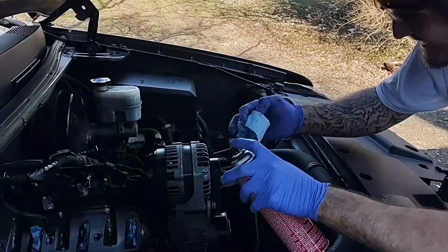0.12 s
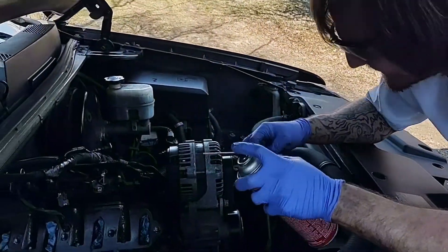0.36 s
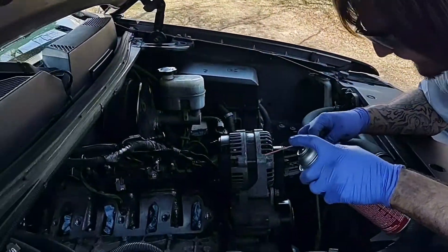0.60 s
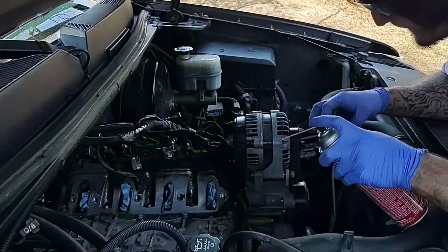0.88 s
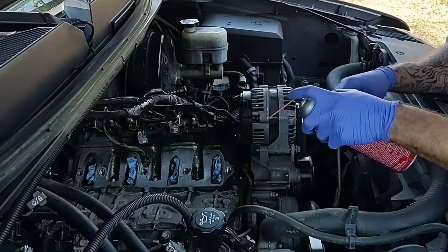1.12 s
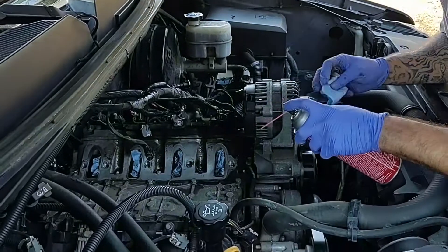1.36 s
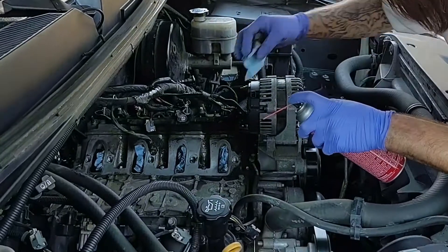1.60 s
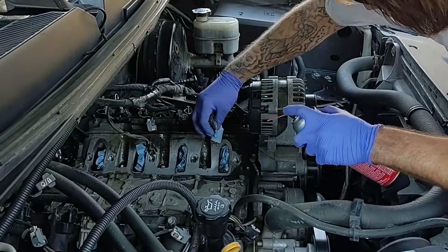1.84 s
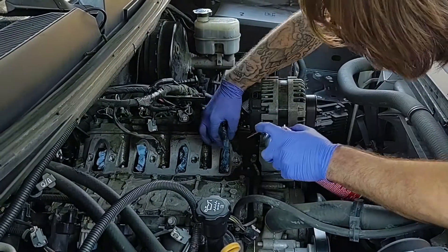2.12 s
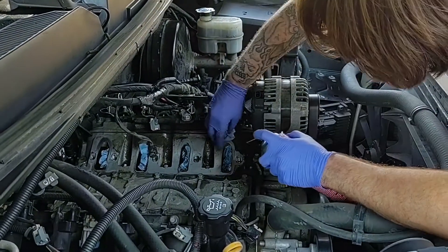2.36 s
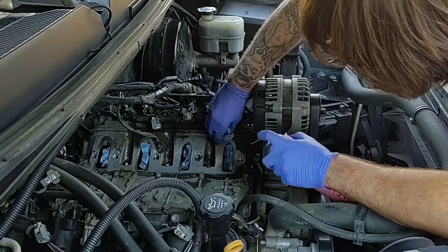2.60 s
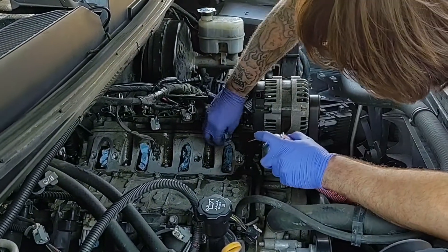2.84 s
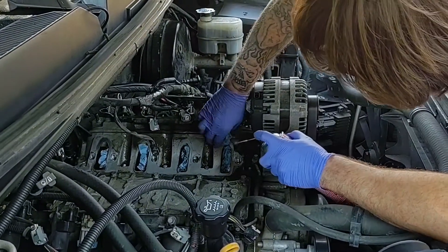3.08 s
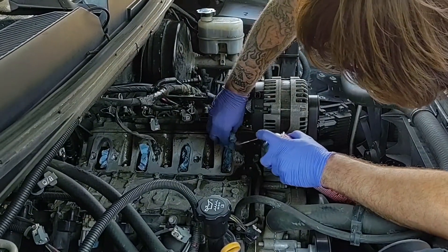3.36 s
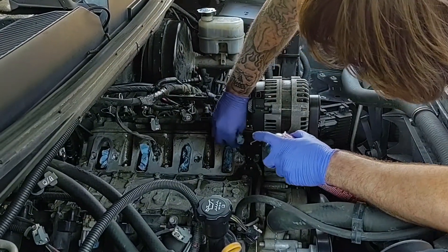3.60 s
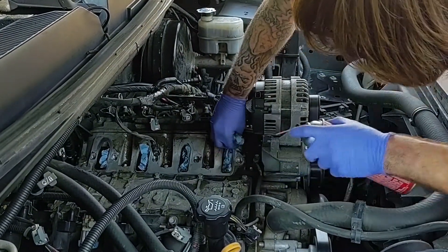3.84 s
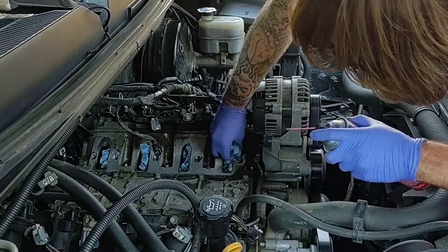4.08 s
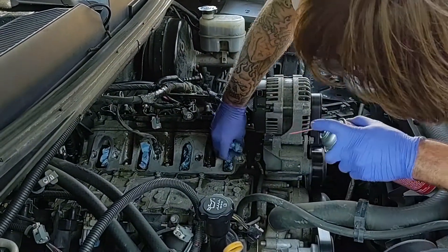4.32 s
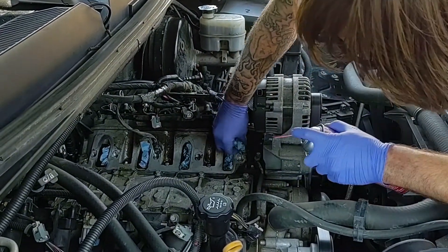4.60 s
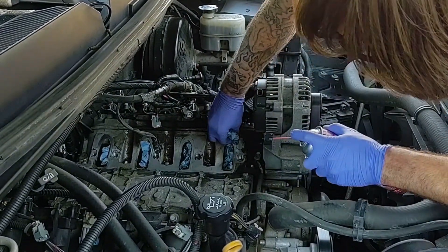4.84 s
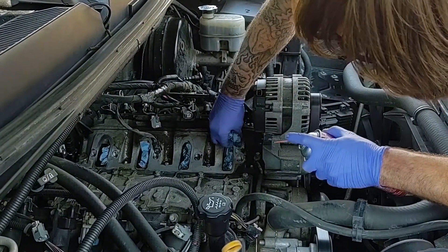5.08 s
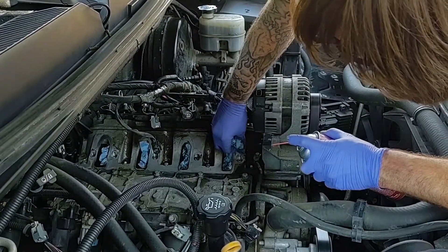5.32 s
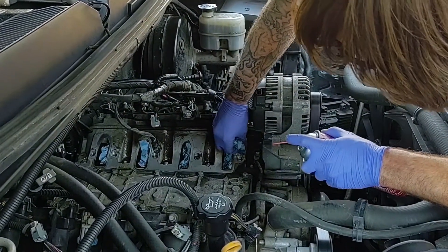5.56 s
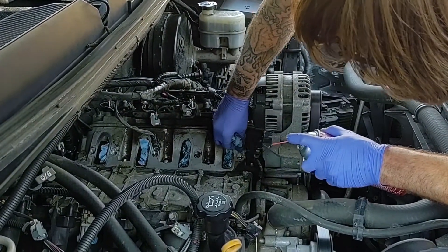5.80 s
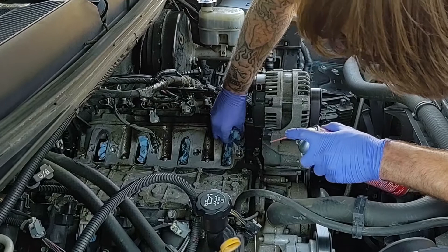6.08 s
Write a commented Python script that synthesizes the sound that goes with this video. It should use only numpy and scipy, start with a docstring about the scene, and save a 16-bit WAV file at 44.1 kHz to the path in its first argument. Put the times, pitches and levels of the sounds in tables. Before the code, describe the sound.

Close stereo sound in an open engine bay outdoors, with very quiet air, softly swelling distant traffic and a faint low drone that slowly grows. From 0 s a gloved hand crumples a rag: fine rustle, crisp bright snaps and light bumps. At about 0.65 s a tight cluster of hollow metallic knocks is the loudest contact, with a thin high squeak just after and a faint wavering whistle near 0.9 to 1.05 s. Smaller knocks and snaps continue to 1.95 s, then it calms to slight rustling. A short rub at 2.8 s leads to two strong, dry, hissy strokes near 3.1 and 3.5 s. Small bumps fall around 3.8 s, then soft even scrubbing strokes come roughly every 0.15 s until 4.85 s. From 4.95 s rougher rubs and sharp snaps mix with low wind popping on the left, a strong stroke at 5.8 s, then lighter rubbing to about 6.2 s.

```python
"""Rag scrubbing in an engine bay

A gloved hand crumples a rag, bumps around an open engine bay, then scrubs the metal ports back and forth.
Dense fibre ticks follow the hand's speed; noise ticks make the snaps, ringing modes the knocks, and the bay
scatters rag, snaps and cracks. Thin sine tones, filtered-noise traffic, a drone and a faint hiss surround
them; wind is lumpy low noise, with late gusts popping on the left microphone port."""
import sys
import numpy as np
from scipy import signal
from scipy.fft import rfft, irfft
from scipy.io import wavfile
from scipy.ndimage import uniform_filter1d

SR = 44100
rng = np.random.default_rng(int(sys.argv[2]) if len(sys.argv) > 2 else 0)


def volts(x):
    """Linear amplitude factor 10**(x/20) for a level x in dB, scalar or array-like."""
    e = np.asarray(x, float) / 20
    return 10 ** e


def generate_wav(sig):
    """Save sig (samples, or channels by samples) to the path in sys.argv[1] as 16-bit PCM at SR."""
    pcm = np.round(np.clip(np.atleast_2d(sig).T, -1, 1) * 32767).astype(np.int16)
    wavfile.write(sys.argv[1], SR, pcm)


N = 272979

# Tone of light fibres on metal. Each row: frequency in Hz, relative level in dB.
FIBRE_TONE = [(1500, -65), (2500, -32.5), (4500, -19), (7000, -8.5), (9000, -5), (12400, 3), (14000, -6.5),
              (15000, -2), (16000, -10)]
# Tone of a hard contact. Each row: frequency in Hz, relative level in dB.
CONTACT_TONE = [(500, -28), (900, -11), (1300, -3), (1800, -4.5), (2600, -3), (3500, -7), (5300, -14.5),
                (14000, -19)]


def read(points, hz):
    """Reads a spectrum at hz, interpolating along log frequency."""
    f, value = np.transpose(points)
    return np.interp(np.log(hz + 1), np.log(f + 1), value)


def evened(x):
    """Scales to rms 1."""
    return x / np.sqrt(np.mean(x ** 2) + 1e-20)


def colour(x, points):
    """Shapes the spectrum of x by a curve in dB."""
    gain = volts(read(points, np.fft.rfftfreq(x.shape[-1], 1 / SR)))
    return irfft(rfft(x) * gain, x.shape[-1])


def curve(rows):
    """Draws the columns of a timed table sample by sample."""
    s, *columns = np.transpose(rows)
    return [np.interp(np.arange(N) / SR, s, c) for c in columns]


def add(mix, s, sound):
    """Mixes a sound in at time s, in seconds."""
    part = mix[round(s * SR):][:len(sound)]
    part += sound[:len(part)]


def resonate(x, hz, width_hz):
    """Shifts hz down to zero, smooths, shifts back: a resonance of gain 1."""
    turn = np.exp(2j * np.pi * np.cumsum(hz * np.ones(len(x))) / SR)
    r = np.exp(-np.pi * width_hz / SR)
    smooth = signal.lfilter([1 - r], [1, -r], x / turn)
    return 2 * (turn * smooth).real


def wobble(seconds):
    """Slow random drift of rms 1: noise averaged twice over a short window."""
    size = round(seconds * SR)
    once = uniform_filter1d(rng.standard_normal(N), size=size)
    return evened(uniform_filter1d(once, size=size))


def burst(t60, rise_s):
    """Envelope of a short event: a quick rise times an exponential fall."""
    t = np.arange(round(.3 * SR)) / SR
    rise = 1 - np.exp(-t / max(rise_s, 1e-4))
    return rise * volts(-60 * t / max(t60, .004))


def fibres(per_s, spread_db, clump_db):
    """Dense ticks of uneven size that come in clumps of a few milliseconds."""
    ticks = rng.choice([-1., 1.], N) * (rng.random(N) < per_s / SR)
    size_db = spread_db * np.minimum(rng.exponential(1, N), 4)
    return ticks * volts(size_db + clump_db * wobble(0.0025))


def swells(rows):
    """Summed gain of sources that near and recede: power falls as 1 / distance squared."""
    t = np.arange(N) / SR
    power = sum(volts(2 * db) / (1 + ((t - s) / width_s) ** 2) for s, db, width_s in rows)
    return np.sqrt(power)


def yard():
    """Outdoor hush, traffic that swells as it passes, and a drone; hush and traffic are most alike in the bass."""
    # Each row: frequency in Hz, relative level in dB.
    hush_tone = [(18, -49), (30, 1.5), (114, -4), (231, -9), (434, -14.5), (660, -19), (904, -24),
                 (1090, -21.5), (1530, -14.5), (2580, -27), (3620, -23.5), (5960, -31), (7160, -36),
                 (12400, -24), (15700, -67)]
    # Each row: frequency in Hz, likeness of left and right from 0 to 1.
    likeness = [(60, 0.9), (300, 1), (700, 0.632), (1400, 0.709), (2500, 0.45), (16000, 0.21)]
    # Far vehicles. Each row: nearest moment in seconds, tyre roar in dB, tyre hiss in dB,
    # time to fall 3 dB in seconds.
    passes = [(0, -90, -57, 0.13), (.93, -64.5, -58, 0.2942), (2.8, -60.5, -62, 0.52),
              (4.3, -67, -64.5, 0.25), (5.25, -60.5, -53.5, 0.2811), (6.05, -60, -54.5, 0.12)]
    # Centre of the tyre roar; it rises and falls once, around 2.2 to 3.4 s.
    # Each row: time in seconds, frequency in Hz.
    roar_pitch = [(0, 870), (2.2, 878), (2.65, 940), (3.05, 950), (3.4, 864.3), (6.19, 895)]
    roar_width_hz, hush_db = 280, -57
    # a distant machine drone, slowly growing
    drone_hz, drone_width_hz, drone_start_db, drone_db_per_s = 123.3, 16.6, -65.5, 1.8

    a, b = rfft(rng.standard_normal((2, 3, N)))
    same = np.clip(read(likeness, np.fft.rfftfreq(N, 1 / SR)), 0, 1)
    right = same * a + np.sqrt(1 - same ** 2) * b
    hush, roar, hiss = np.moveaxis(irfft([a, right], N), 1, 0)

    hush_gain = volts(hush_db + 1.5 * wobble(0.063))
    hush = hush_gain * evened(colour(hush, hush_tone))

    roar_hz = curve(roar_pitch)[0]
    roar = [resonate(resonate(port, roar_hz, roar_width_hz), roar_hz, roar_width_hz) for port in roar]
    roar = swells([(s, roar_db, fall_s) for s, roar_db, _, fall_s in passes]) * evened(np.array(roar))

    hiss = colour(hiss, [(1200, 4), (2000, 10.0), (2700, 10), (3300, 9.5), (4200, -71)])
    hiss = swells([(s, hiss_db, fall_s) for s, _, hiss_db, fall_s in passes]) * evened(hiss)

    drone = resonate(rng.standard_normal(N), drone_hz, drone_width_hz)
    drone = evened(resonate(drone, drone_hz, drone_width_hz))
    drone_gain = volts(drone_start_db + drone_db_per_s * np.arange(N) / SR)
    return hush + roar + hiss + drone_gain * drone


def narrow_hiss():
    """A faint thin band of smooth noise comes and goes, unrelated in the two ports."""
    # Each row: top of the swell in seconds, level in dB, time to fall 3 dB in seconds (sign has no effect).
    thin_swells = [(.85, -100, 2), (3.9, -75, -7), (5.2, -79.5, 3), (6.15, -54.5, 0.18)]
    tone = [(3300, -36), (3900, -8), (4500, -1.5), (4900, 1), (5600, -20.5), (7000, -13)]
    band = colour(rng.standard_normal((2, N)), tone)
    return swells(thin_swells) * evened(band)


def wind():
    """Turbulence as lumpy low noise, unrelated per port and stronger on the left, plus pops on the left port."""
    # Stronger wind. Each row: start in seconds, length in seconds, level in dB.
    blasts = [(2.755, 0.34, -57), (4.924, 0.91, -46.5), (5.94, 0.029, -49.5)]
    # Pops on the port. Each row: time in seconds, level in dB, pitch in Hz, sharp edge relative to the pop in dB.
    gusts = [(4.951, -33, 108.6, -8), (4.969, -26.5, 107, -11), (5.049, -28.5, 133.3, -17),
             (5.066, -31, 99, -22), (5.138, -32, 130, -14), (5.198, -29.5, 173, -22),
             (5.241, -26.5, 117.4, -4.5), (5.298, -25.5, 148, -12), (5.309, -29.5, 158, -22),
             (5.324, -26, 152, -12), (5.437, -28, 110, -18.5), (5.544, -28, 151, -16), (5.572, -37, 93, -4),
             (5.679, -31.5, 150, -22), (5.784, -33, 95.5, -5), (5.865, -26, 115, -13.5),
             (5.995, -29, 155, -14.5)]
    # Each row: frequency in Hz, relative level in dB.
    buffet_tone = [(25, -38), (55, 5.5), (100, 2.5), (200, -2.5), (350, -18), (700, -33), (1500, -30)]
    breeze_db, breeze_db_per_s = -78, 4.5  # level at the start and its growth
    blast_rise_s, blast_fall_db_per_s = 0.016, 220
    edge_ratio = 2.29  # pitch of the edge over that of the pop

    t = np.arange(N) / SR
    level = volts(breeze_db + breeze_db_per_s * t)
    for s, length, db in blasts:
        rise = np.clip((t - s) / blast_rise_s, 0, 1) ** 2
        level += rise * volts(db - blast_fall_db_per_s * np.maximum(t - s - length, 0))
    lumps = np.array([volts(3.5 * wobble(.015)) * rng.standard_normal(N) for port in "lr"])
    port_gain = volts(np.array([[0], [-11]]))
    out = level * evened(colour(lumps, buffet_tone)) * port_gain

    t = np.arange(-1500, 1500) / SR
    for s, db, hz, edge_db in gusts:
        # a rounded pressure kick with a deeper swing back
        pop = np.exp(-(1.75 * hz * t) ** 2) * np.cos(2 * np.pi * hz * t + 1.85)
        edge_hz = edge_ratio * hz
        edge = np.exp(-(1.3 * edge_hz * t) ** 2) * np.cos(2 * np.pi * edge_hz * t + 1.7)
        add(out[0], s + t[0], volts(db) * (pop + volts(edge_db) * edge))
    return out


def thin_tones():
    """Thin sine tones that waver in pitch and flutter in level."""
    # A whistle that arches up and down. Each row: time in seconds, pitch in Hz, level in dB.
    whistle = [(.872, 5150, -85), (.884, 5130, -58), (.908, 5150, -66), (.922, 5300, -62),
               (.944, 5340, -68), (.956, 5320, -58), (.994, 5300, -58), (1.012, 5380, -61),
               (1.026, 5200, -60), (1.05, 5280, -67), (1.07, 5250, -90)]
    # Very high, thin tones: one under a snap, one squeak.
    # Each row: start in seconds, length in seconds, pitch in Hz, level in dB.
    high_tones = [(.246, .022, 15400, -41), (0.732, 0.061, 15700, -43)]
    waver_hz, flutter_db = 25 * wobble(0.0046), 2.2 * wobble(0.006)
    hz, db = curve(whistle)
    out = volts(db + flutter_db) * np.sin(2 * np.pi * np.cumsum(hz + waver_hz) / SR)
    for s, length, hz, db in high_tones:
        at = np.arange(round(s * SR), round((s + length) * SR))
        tone = np.sin(2 * np.pi * np.cumsum(hz + waver_hz[at]) / SR)
        fade = signal.windows.tukey(len(at), .3)
        add(out, s, volts(db + flutter_db[at]) * tone * fade)
    return out


def knocks():
    """A blow and short rattle ring panel modes near a favoured pitch, over a broad thud, with a gritty crack."""
    # Knuckles and can against the bay. Each row: time in seconds, level in dB, favoured pitch in Hz,
    # crack trim in dB, rattle scale in seconds (lengthens rattle, thud and crack).
    blows = [(0.001, -40, 370, -6, 0.12), (0.281, -38.5, 384, -9.5, 0.018), (0.308, -42.5, 367, -16, 0.036),
             (0.646, -22, 490, -19, 0.011), (0.655, -23, 526, -16, 0.00175),
             (0.664, -25, 464, -34.5, 0.005), (.685, -30.5, 406, -23, 0.076),
             (0.962, -34.5, 263, -16, 0.032), (1.006, -41, 430, -14.5, 0.47),
             (1.148, -31.5, 517, -5.5, 0.0086), (1.415, -47, 520, -18, 0.0196),
             (1.425, -39.5, 447, -0.5, 0.0197), (1.444, -35.5, 456, -13, 0.023),
             (1.488, -34, 590, -9, 0.044), (1.92, -34.5, 620, -5, 0.0165), (1.952, -36.5, 640, -6.5, 0.031),
             (2.98, -39.5, 190, -38, 0.0375), (3.811, -35.5, 274, -14, 0.047),
             (3.825, -34, 610, -8.5, 0.031), (3.884, -38, 250, -16.5, 0.009)]
    # Panel modes. Each row: pitch in Hz, level in dB, t60 in seconds before the cap below.
    panel = [(344, -9.5, 0.26), (431, -1.5, 0.11), (492.4, 3, 0.11), (547.5, 2, .1), (617, 3.5, 0.099),
             (889, -2, 0.93), (1270, -23, 0.26)]
    ring_db, thud_db, thud_t60_s, longest_ring_s = -4, -17, 0.09, .07

    low, high, t = np.zeros(N), np.zeros(N), np.arange(round(.3 * SR)) / SR
    noises = rng.standard_normal((len(blows), 3, len(t)))
    for (s, db, hz, crack_db, rattle_s), (push, dull, grit) in zip(blows, noises):
        ring = np.zeros(len(t))
        for f, level, t60 in panel:
            distance_db = 29 * abs(np.log2(f / hz))  # modes away from the favoured pitch ring less
            fall_db = 60 * t / min(t60, longest_ring_s)
            ring += volts(level - distance_db - fall_db) * np.sin(2 * np.pi * f * t)
        ring *= np.minimum(t / 0.0016, 1)  # a soft knuckle builds the ring over a moment

        blow = push * burst(4 * rattle_s, 0.0002)
        blow[0] = 30.0  # the hit itself, ahead of the rattle
        body = signal.fftconvolve(blow, ring)[:len(t)]
        body /= abs(body).max()

        thud_tone = [(70, -30), (0.14 * hz, -6), (hz, 0), (1.18 * hz, -9), (5 * hz, -30), (16000, -80)]
        thud = evened(colour(dull, thud_tone)) * burst(thud_t60_s + 6 * rattle_s, 0.0013)
        add(low, s, volts(db + ring_db) * body + volts(db + thud_db) * thud)

        crack_shape = burst(0.13 + 3 * rattle_s, 0.0016) + 1.1 * burst(0.029, 0.00039)
        crack = evened(colour(grit ** 3, CONTACT_TONE)) * crack_shape  # cubing makes the noise spiky
        add(high, s, volts(db + crack_db - 4.5) * crack)
    return low, high


def snaps():
    """Each snap is a crisp tick of noise with a favoured pitch, a duller part and a short fizz after it."""
    # Snaps of cloth and glove. Each row: time in seconds, level in dB, pitch in Hz,
    # dull part relative to the pitched part in dB.
    snap_rows = [(.194, -57.5, 11000, -16), (0.246, -38.5, 15500, -45), (0.2882, -45, 13400, -11),
                 (0.307, -41, 9300, -3.5), (0.3396, -47.5, 5910, -8), (0.522, -36.5, 8700, -31),
                 (0.524, -45, 5580, -28), (.627, -37, 11300, -12), (0.6412, -28, 11400, -27.5),
                 (0.7285, -39.5, 11300, -9.5), (0.762, -40, 7140, -9), (0.766, -40, 11700, -23.5),
                 (.83, -34.5, 12300, -37), (.857, -45, 11600, -26.5), (1.0114, -37.5, 10900, -29),
                 (1.0813, -36.5, 14360, -16), (1.106, -47, 13500, -22), (1.136, -44, 9950, -3),
                 (1.148, -39, 7750, 3.5), (1.243, -40.5, 11040, -35), (1.256, -51, 11560, -30),
                 (1.287, -39, 9500, -33), (1.287, -46, 5910, -33.5), (1.3432, -47, 7200, -25),
                 (1.414, -45.5, 9000, -3), (1.482, -43, 9000, -25), (1.49, -38, 11370, -25),
                 (1.591, -48, 12600, -20), (1.747, -49, 9700, -19), (1.85, -47, 9850, -13),
                 (1.865, -46, 9200, 1), (2.08, -52.5, 8850, 0), (2.16, -56, 11400, -23),
                 (2.214, -54.5, 8500, -15), (2.298, -55, 11000, -22), (2.354, -49.5, 9300, -45),
                 (2.419, -44, 10900, -31), (2.6337, -49.5, 6200, -23), (3.067, -37, 3540, -7),
                 (3.086, -27, 11880, -27), (3.218, -41.5, 5800, -28), (3.262, -37.5, 12400, -19),
                 (3.4338, -37.5, 11600, -20.5), (3.442, -39.5, 3750, -25), (3.824, -46.5, 9080, 10.5),
                 (3.807, -50, 10000, 0), (4.24, -51.5, 2300, 4), (4.975, -34.5, 9150, -13.5),
                 (5.109, -34, 12000, -29.5), (5.125, -39, 13000, -25), (5.215, -53, 11500, -25),
                 (5.405, -56, 14500, -25), (5.693, -56, 12000, -25), (5.5933, -44, 10800, -25),
                 (5.5998, -29.5, 11180, -38.5), (5.622, -38, 12600, -29.5), (5.757, -42.5, 12200, -2),
                 (5.901, -30.5, 13200, -17)]
    tick_t60_s, fizz_t60_s, broad_db = .016, .045, -4.5
    out = np.zeros(N)
    shape = burst(fizz_t60_s, 0.00036) + 1.7 * burst(tick_t60_s, 0.00068)
    noises = rng.standard_normal((len(snap_rows), 3, len(shape)))
    for (s, db, hz, dull_db), (thin, wide, low) in zip(snap_rows, noises):
        pitched = evened(resonate(resonate(thin, hz, 1700), hz, 1700))
        broad = evened(colour(wide, FIBRE_TONE))
        dull = evened(colour(low, CONTACT_TONE))
        tick = pitched + volts(broad_db) * broad + volts(dull_db) * dull
        add(out, s, volts(db) * tick * shape / shape.max())
    return out


def rag():
    """Fine and coarse fibre ticks follow the hand's speed, arching over each stroke; a rustle runs throughout."""
    # Each row: start in seconds, length in seconds, fine rub in dB, coarse drag relative to it in dB,
    # place of top speed from 0 to 1.
    rubs = [(0.113, 0.102, -65, 2, 1), (0.301, 0.14, -74, 10, 1), (0.617, 0.1, -45.5, -7.5, 0.3),
            (0.712, 0.1, -51, -17, 0.07), (0.804, 0.081, -50.5, -27, 0.5), (0.946, 0.15, -60, -9.5, 0),
            (1.07, 0.09, -57.5, -12, 0.9), (1.396, .04, -62, 2.5, 0.88), (1.478, 0.12, -57, -17, 0),
            (1.748, 0.0147, -56, -2.5, .9), (1.85, .04, -64.5, 4, 0), (1.899, 0.073, -47, -1.5, 0.94),
            (2.347, 0.09, -66.5, 1, 1), (2.748, 0.12, -46, -7, 0.93), (2.906, 0.036, -65, -4, .4),
            (3.049, 0.16, -29.5, -14.5, 0.63), (3.212, 0.039, -48.5, -8, 0.1),
            (3.427, .15, -28.5, -18, 0.63), (3.655, 0.155, -58.5, -2, 0.56), (3.867, .1, -52, -8.5, 0.53),
            (4.009, 0.1467, -49.5, -11, 0.25), (4.17, 0.1185, -51.5, -7, 0.63),
            (4.321, 0.1138, -50, -13, 0.76), (4.476, 0.1068, -56, -6.5, 0.37),
            (4.62, .097, -52.5, -7.5, 0.56), (4.75, 0.1114, -51, -12.5, 0.87),
            (4.927, 0.046, -54.5, -18, .8), (4.97, 0.098, -39.5, -9.5, 0.33),
            (5.007, 0.089, -34, -20, 0.27), (5.028, 0.075, -37.5, 5, 0.46), (5.115, 0.072, -57.5, -3, .05),
            (5.244, .07, -59, -3, 0.8), (5.292, 0.078, -41, -9, 0.77), (5.441, 0.073, -61, -4.5, 0.87),
            (5.5, 0.0872, -40, -9, 0.72), (5.59, 0.07, -47.5, -12, 0), (5.745, 0.15, -28.5, -13.5, 0.72),
            (5.89, 0.094, -57, -0.5, 0), (6.044, 0.13, -62, -1, 0.33)]
    # Pressed cloth dragging. Each row: frequency in Hz, relative level in dB.
    drag_tone = [(900, -28.5), (1600, -21.5), (2600, -4.5), (4200, -1), (6000, 0), (8500, 0.5),
                 (12000, -5.5), (16000, -44)]
    # Cloth shifting in the hand. Each row: time in seconds, level in dB before the creases.
    rustle_levels = [(0, -66), (.9, -63), (1.3, -68.5), (1.95, -67), (2.2, -70.5), (3.5, -71), (4.3, -67),
                     (4.8, -74.5), (5.2, -68), (5.8, -70), (6.19, -83)]
    fine_power, drag_power = 1.78, 0.87  # how steeply each kind of friction grows with speed
    # light strokes grip evenly, firm ones follow the speed steeply
    firm_db, light_db, light_share = -29.5, -47, 0.59
    linger_db, linger_s = -32, 0.047  # the cloth settles after a stroke
    rustle_coarse_db, creases_per_s, crease_db = 0, 16, 3

    strokes = np.zeros((2, N))
    for s, length, db, drag_db, top in rubs:
        along = np.linspace(0, 1, round(length * SR))
        u = np.interp(along, [0, np.clip(top, .05, .95), 1], [0, .5, 1])
        speed = np.abs(np.sin(np.pi * u))
        speed **= np.interp(db, [light_db, firm_db], [light_share, 1])
        add(strokes[0], s, volts(db) * speed ** fine_power)
        add(strokes[1], s, volts(db + drag_db) * speed ** drag_power)
    keep = np.exp(-1 / (linger_s * SR))
    strokes += volts(linger_db) * signal.lfilter([1 - keep], [1, -keep], strokes)

    rustle = volts(curve(rustle_levels)[0])
    crease_sizes = volts(crease_db + 2.3 * np.minimum(rng.exponential(1, N), 3))
    creases = (rng.random(N) < creases_per_s / SR) * crease_sizes
    rustle *= 1 + signal.oaconvolve(creases, burst(0.0097, 0.00061))[:N]

    fine = (strokes[0] + rustle) * evened(colour(fibres(13000, 2.2, 1.8), FIBRE_TONE))
    coarse_gain = strokes[1] + volts(rustle_coarse_db) * rustle
    return fine + coarse_gain * evened(colour(fibres(9000, 2.2, 1.8), drag_tone))


def bay(x, wet_db):
    """Direct sound plus scattered close reflections, different per port, from three sets that fade in turn."""
    t, out = np.arange(round(.05 * SR)) / SR, np.array([x, x])
    for k in range(3):
        sparse = rng.standard_normal((2, len(t))) * (rng.random((2, len(t))) < .25)
        taps = sparse * volts(-60 * t / 0.048)
        taps *= volts(wet_db) / np.linalg.norm(taps, axis=1, keepdims=True)
        # the three squares sum to 1
        turn = np.sqrt(2 / 3) * np.cos(np.pi * (28 * np.arange(N) / SR + k / 3))
        out += signal.oaconvolve((x * turn)[None], taps, axes=1)[:, :N]
    return out


def scene():
    """The rag works deep in the bay, snaps and cracks above it; the low knocks reach both ports alike."""
    low, high = knocks()
    near = bay(rag(), 4.97) + bay(snaps() + high, -1.4) + low + thin_tones()
    return near + yard() + narrow_hiss() + wind()


def top_cut(x):
    """Nothing passes above the cut-off."""
    return signal.sosfilt(signal.butter(12, 16640, fs=SR, output="sos"), x)


def record(dry):
    """The left port is nearer but shaded in the treble; the housing colours both and the top is cut off."""
    # Each row: frequency in Hz, phase by which the left port leads in radians.
    lead_phase = [(0, 0), (500, 0.43), (1120, 2), (2670, 6.5), (16000, 29.5)]
    # Each row: frequency in Hz, gain of the left port relative to the right in dB.
    port_balance = [(60, 1.5), (99, 0), (160, 0.5), (270, 1), (450, 1.5), (740, -1), (1220, 3.5),
                    (2010, -8), (3330, -12), (5500, -4), (9080, -11), (15000, -13)]
    # Microphone housing. Each row: frequency in Hz, gain in dB.
    housing = [(30, -25), (80, 1.5), (1800, 0.5), (2700, 4), (3300, -3.5), (3800, -2), (4600, -1),
               (5200, -1), (16000, -4)]
    edge_hz = 15950
    lead = np.interp(np.fft.rfftfreq(N, 1 / SR), *np.transpose(lead_phase))
    left = irfft(rfft(colour(dry[0], port_balance)) * np.exp(1j * lead), N)
    ports = colour(np.array([left, dry[1]]), housing)
    low_pass = signal.firwin(511, edge_hz, window=("kaiser", 7), fs=SR)
    ports = signal.oaconvolve(ports, low_pass[None], "same")
    return top_cut(ports)


dry = scene()
out = record(dry)
generate_wav(out)
```